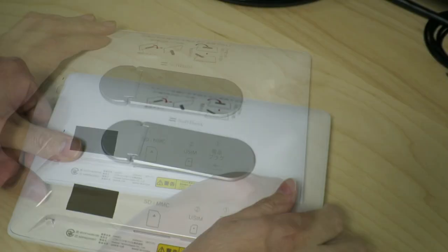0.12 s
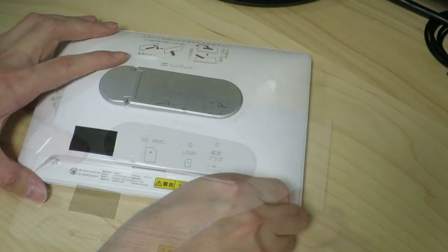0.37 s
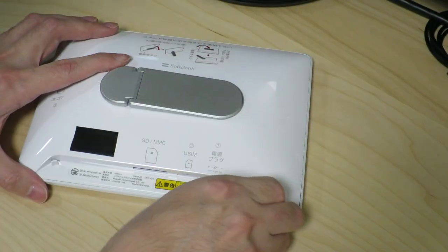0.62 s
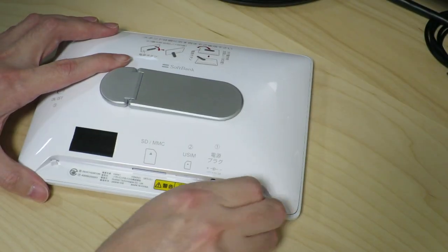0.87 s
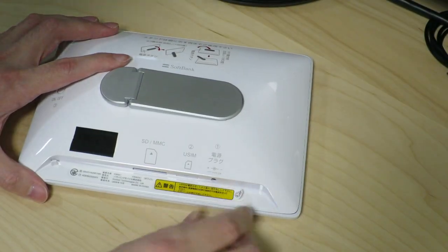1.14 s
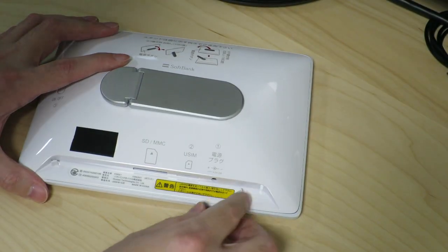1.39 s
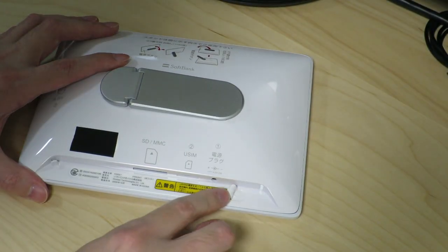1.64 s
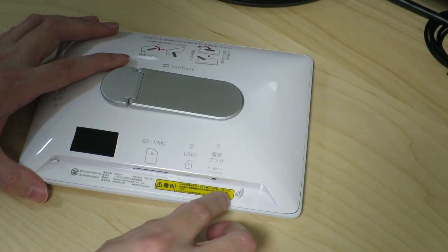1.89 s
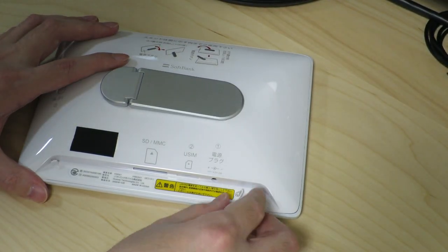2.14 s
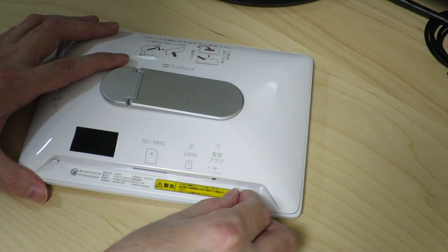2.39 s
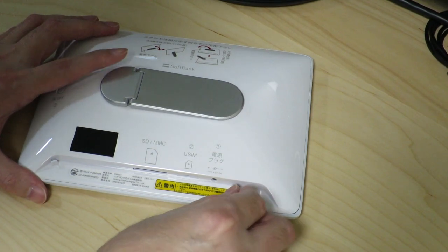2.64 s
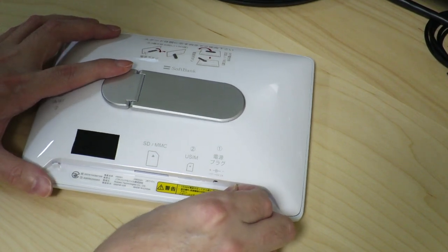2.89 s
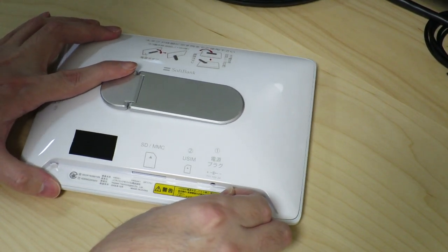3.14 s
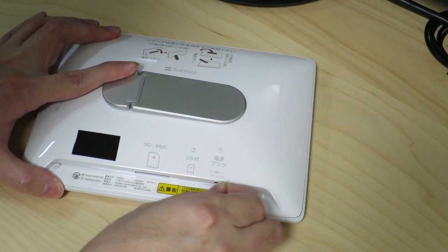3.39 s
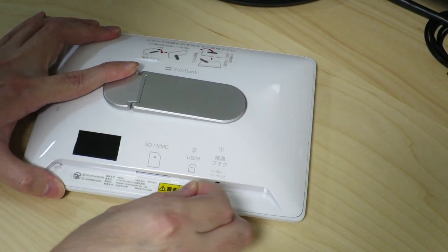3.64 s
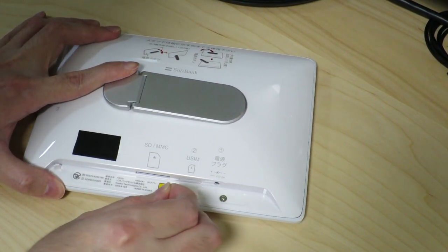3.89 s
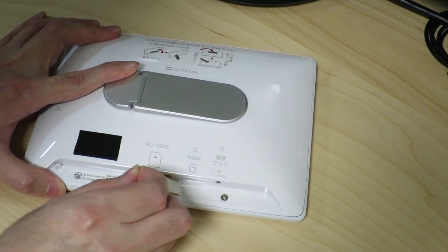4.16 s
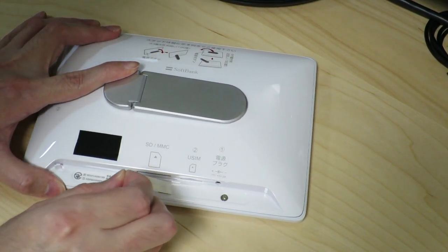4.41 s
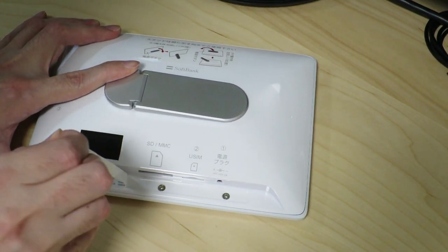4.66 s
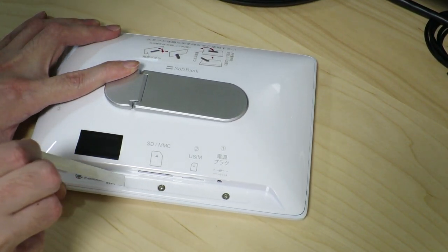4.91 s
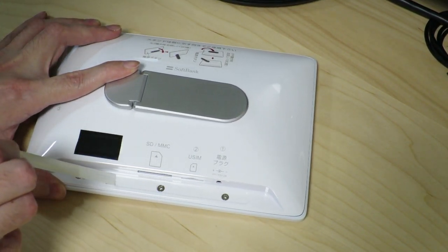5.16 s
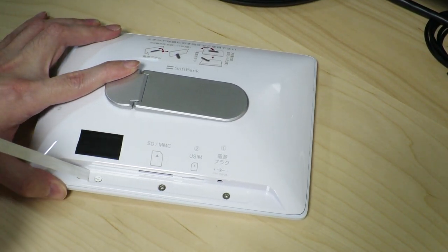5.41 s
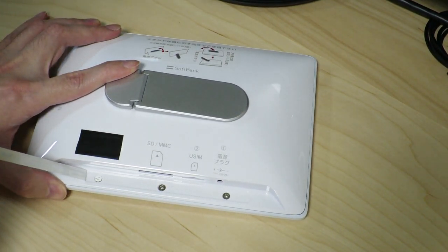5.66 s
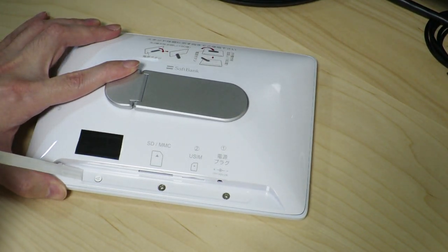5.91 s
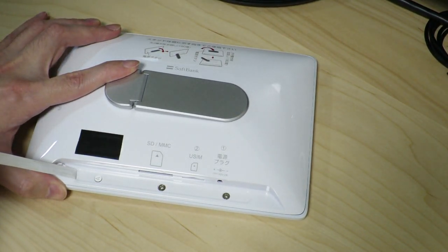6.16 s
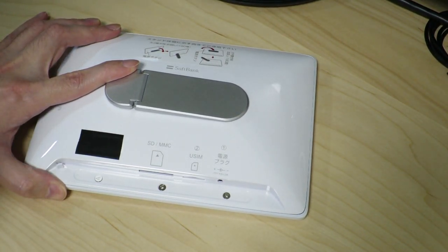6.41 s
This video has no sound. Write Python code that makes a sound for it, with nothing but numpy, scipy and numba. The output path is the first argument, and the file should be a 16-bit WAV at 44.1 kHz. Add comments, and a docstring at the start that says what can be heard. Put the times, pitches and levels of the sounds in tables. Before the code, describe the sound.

A small quiet room holds a soft, low fan hum with airy hiss and a barely noticeable, very high beating whine; a little extra rumble colours the first half second. At about 0.43 s a flat plastic gadget knocks solidly on a wooden desk. Tiny nail ticks follow, with clearer dry clicks on the hollow plastic back near 1.1, 1.43, 1.7 and 1.95 s, and a weaker one at 2.4. It stays nearly still until faint rubbing from 3.1 s and a short rip into a loud plastic pop at 3.5. Thin fizzing peel follows, with crackling bursts at 4.25 and 4.45, then a rapid dense tearing run from 4.6 to 4.75. Peeling softens, swells again around 5.4-5.5 with bright snaps, fades to light rubbing, and ends in crisp glue snaps at 6.4-6.45. Close and dry, with short reflections.

```python
"""A fan hums in a small room under two faint high whines that beat; then nails pick at a sticker strip
on the plastic back of a flat gadget on a wooden desk, and peel it off.
Noise bursts ring film and shell for nail slips and glue snaps; random snaps make the strokes and peel crackle.
Half-sine pushes ring desk and shell modes; filtered noise makes air, fan and rumble; sines make the whines.
A limiter turns everything down after loud peaks."""
import sys
import numpy as np
from scipy import signal
from scipy.fft import rfft, irfft
from scipy.io import wavfile
from scipy.ndimage import uniform_filter1d
from numba import njit

SR = 44100
rng = np.random.default_rng(int(sys.argv[2]) if len(sys.argv) > 2 else 0)


def invert_db(x):
    """Field ratio 10**(x/20) for x, a level in decibels (scalar or array-like)."""
    u = np.asarray(x, float) / 20
    return 10 ** u


def wrap_up_sound(samples):
    """Save the sound to the file named by the first command line argument, as 16-bit audio."""
    columns = np.atleast_2d(samples).T
    # keep every value between -1 and 1, then stretch to whole-number steps
    tamed = np.clip(columns, -1, 1)
    steps = np.round(tamed * 32767).astype(np.int16)
    wavfile.write(sys.argv[1], SR, steps)


N = 288458
T = np.arange(N) / SR

# Source levels below are ahead of room and limiter.
# air noise spectrum, relative: hz, density_db (per Hz)
AIR_SPECTRUM = [(30, -12.5), (60, -3.5), (146, -3), (400, -7.5), (750, -10), (1750, -12.5), (3570, -15.5),
                (7000, -20.5), (10800, -25.5), (14500, -29), (16000, -57)]
# fan resonances, before wander, pan and room gain: hz, width_hz, rms_db
FAN_RESONANCES = [(881.6, 77, -50.5), (1161, 95, -54), (1320, 57, -59), (1460, 46, -58.5)]
# side gain of air and fan: hz, gain_db
AIR_SIDE_GAIN = [(60, -8), (110, -0.5), (200, 5.5), (380, 7), (700, 1.5), (1290, -0.5), (2380, -4.5),
                 (4400, -6.5), (8120, -2.5), (15000, 0)]
# whines, before channel offsets and room gain: hz, rms_db, phase_rad
WHINES = [(15734.25, -53, 0.), (15747.29, -59, -1.65)]
# room and low rumble, louder over the first half second: time_s, room_gain_db, rumble_db (before wander)
ROOM_LEVELS = [(0, 3, -44.5), (.2, 2, -54), (.42, 2.5, -46), (.6, -1.5, -76), (.8, -0.5, -62.5),
               (6.54, -1.5, -65.5)]
# wall tail bands, relative: centre_hz, t60_s, gain_db
ROOM_BANDS = [(158, 0.2, -5), (960, 0.11, 1), (3800, 0.15, 1.5), (11700, 0.23, -12.5)]
# side gain of the near sounds' reflections: hz, gain_db
NEAR_SIDE_GAIN = [(60, -31), (400, -24), (1200, -10), (2600, -48), (4400, -9.5), (8000, -2), (15000, 2.5)]
# gadget bumps the desk top: start_s, peak_db, contact_ms
DESK_BUMPS = [(.043, -48, 0.8), (.4305, -5.5, 0.55)]
# desk modes, relative: hz, level_db, t60_s
DESK_MODES = [(129, 5.5, 0.083), (154, -3.5, 0.11), (255, -29, 0.078), (354.5, -15.5, 0.19),
              (513, -8, 0.097), (570, 3.5, 0.054), (665, -8, 0.13), (780, 4, 0.056), (865, 6, 0.05),
              (980, 0, 0.067), (1100, -5, 0.052), (1213, 5, 0.031), (1400, -30, 0.077), (1600, -5, 0.1),
              (2000, -26, .07), (2420, -20, .06), (2880, -23, .07)]
# shell flexes and knocks: start_s, peak_db, contact_ms
SHELL_KNOCKS = [(.692, -27, 1.3), (.701, -31, 0.85), (.712, -36, 4.2), (1.0945, -28, 0.65),
                (1.27, -31, 0.46), (1.432, -24.5, 1.47), (1.443, -26, 3.5), (1.466, -26, 0.78),
                (1.72, -35, 1.2), (1.935, -32, 1.15), (1.98, -34, 1.4), (2.413, -30, 1.2),
                (3.12, -34, 0.99), (3.15, -32, 0.71), (3.5283, -14.5, 0.92), (3.5303, 0, 1.1),
                (4.285, -28, 0.52), (4.592, -21.5, 1), (4.645, -32, 1.7), (4.684, -33.5, 1.6),
                (5.458, -30, 1.1), (6.402, -33, 1.4)]
# low shell modes, relative: hz, level_db, t60_s
SHELL_MODES = [(64, -10, 0.16), (110, 1, 0.069), (156, -6.5, 0.13), (268, -11.5, 0.15), (309, 2.5, 0.092),
               (351, 2.5, 0.052), (485, 6, 0.027), (539, 3, 0.043), (591, -4, 0.066), (746, -3.5, 0.046),
               (862, 9.5, 0.033), (954, 4, 0.044), (1054, 4.5, 0.055), (1260, -8, 0.2), (1440, -5, 0.13),
               (1574, -48, 0.087), (1904, -29, 0.064), (2180, -24, .07)]
# shell resonances, relative: hz, width_hz, level_db
SHELL_PEAKS = [(1514, 180, -3), (2244, 484, 5.5), (2492, 1150, 3.5), (3394, 1020, 2.5), (4250, 1180, 0.5),
               (5600, 2180, -4.5)]
# film resonances, relative: hz, width_hz, level_db
FILM_PEAKS = [(7150, 2500, 2.5), (9700, 1530, 2.5), (12450, 1550, 4), (14850, 840, 2)]
# slow peeling and rubbing: time_s, film_level_db
PEEL_LEVELS = [(0, -60), (.4, -66), (.53, -54), (1.02, -63), (1.16, -58.5), (1.4, -64), (1.6, -59),
               (1.9, -67), (2.2, -70), (3.04, -68), (3.11, -55), (3.23, -66), (3.28, -51), (3.42, -56),
               (3.49, -48), (3.55, -80), (3.69, -80), (3.71, -51), (3.76, -44.5), (3.87, -56),
               (4.07, -56.5), (4.23, -48), (4.36, -63), (4.44, -55), (4.46, -50.5), (4.6, -46.5),
               (4.8, -50), (4.89, -74), (4.99, -68), (5.03, -55), (5.11, -57), (5.27, -48), (5.42, -44),
               (5.54, -53), (5.6, -63), (6.0, -61), (6.14, -51), (6.24, -69.5), (6.32, -56), (6.54, -58)]
# crackle strokes: rips, fading crackle after nail slips, and a slower swell:
# start_s, rise_ms, hold_ms, fall_ms, film_level_db, shell_re_film_db
CRACKLE_STROKES = [(.742, 1, 2, 44, -50, -10), (1.1, 1, 2, 81, -40, -12), (1.44, 37, 2, 60, -55, 6),
                   (1.723, 0.9, 2, 54, -40, -2.5), (1.94, 1, 2, 85, -54, -12), (3.07, 37, 40, 90, -56.5, 3),
                   (3.498, 1, 28.4, 4.6, -24.5, -6), (4.237, 10, 3, 102, -28, -6.5),
                   (4.445, 1, 2, 50, -39, -5), (4.595, 1, 2, 26, -30, 1), (4.612, 21, 26, 25, -35.5, -2),
                   (4.67, 22.7, 43.5, 69, -22.5, -7.5), (5.452, 7.1, 4, 124, -28, -9.5),
                   (5.519, 1.2, 2, 32, -38, -12), (6.403, 1, 2, 59, -33, -7.5),
                   (6.43, 14.3, 4, 6.8, -36, -7.5), (6.453, 1, 1, 60, -30.5, -29)]
# nail slips and glue snaps, before pan:
# start_s, shell_peak_db, film_rms_db (first 4 ms), shell_hz (favoured), film_hz (favoured), tear_t60_ms
NAIL_TICKS = [(0.4301, -18, -50, 3180, 9000, 23), (0.5104, -57, -42, 1400, 12600, 8),
              (0.5197, -54, -40, 5280, 12600, 6), (0.5266, -55, -36, 1450, 12600, 11),
              (0.6014, -53, -50, 1460, 12600, 10), (0.738, -50, -44, 1680, 11500, 16),
              (0.8694, -56, -48, 1630, 11000, 10), (1.0893, -28, -27, 2600, 11600, 18),
              (1.0954, -22, -42, 2300, 12000, 19), (1.431, -17.5, -36, 3260, 10500, 16),
              (1.464, -22, -53, 3300, 11000, 13), (1.7154, -24.5, -33, 3270, 11000, 15),
              (1.745, -44, -42, 1440, 11000, 10), (1.9327, -26, -37.5, 2280, 12600, 15),
              (1.979, -31, -57, 1470, 11000, 12), (2.4133, -32, -48, 2060, 10900, 11),
              (2.736, -48, -52, 3210, 11000, 11), (3.448, -49, -44, 2480, 11000, 13),
              (3.5, -17, -31, 5270, 11000, 11), (3.5296, -10, -30.5, 1400, 9150, 14),
              (3.7199, -33, -49, 5400, 12000, 12), (3.7783, -38, -45, 1460, 12000, 11),
              (4.245, -23, -25, 3280, 11000, 18), (4.2482, -18.5, -25, 3320, 11000, 16),
              (4.2515, -23, -31, 3230, 12000, 18), (4.2602, -28, -22, 2160, 9800, 7.1),
              (4.2668, -24, -34, 3550, 10000, 9), (4.284, -22.5, -32, 2290, 9000, 19),
              (4.4391, -25, -27.5, 4400, 11000, 6.7), (4.592, -17, -25, 4640, 10200, 16),
              (4.621, -34, -30, 1960, 12600, 12), (4.639, -32, -33, 5600, 12600, 11),
              (4.666, -28, -34, 5700, 12000, 15), (4.682, -15, -26, 5740, 10000, 21),
              (4.6912, -13.5, -22, 5770, 10000, 8), (4.7029, -16, -21, 5290, 10000, 9.1),
              (4.713, -17.5, -22, 4260, 10000, 17), (4.746, -16, -23, 5100, 10900, 12),
              (5.0164, -55, -51, 1520, 10000, 8), (5.12, -55, -51, 2830, 10000, 8),
              (5.1335, -40, -43, 1400, 12000, 11), (5.412, -35, -43, 4400, 9000, 13),
              (5.461, -21.5, -18, 4420, 11800, 24), (5.471, -28, -23, 3850, 11500, 8.9),
              (5.5164, -24, -25, 5480, 9700, 8), (6.3143, -53, -47, 1630, 13000, 10),
              (6.3314, -52, -44, 1460, 14500, 13), (6.4011, -14, -24.5, 4240, 10900, 4.2),
              (6.409, -44, -35, 4110, 13000, 8), (6.44, -20, -46, 4290, 8000, 15),
              (6.4505, -23.5, -13, 3800, 9800, 5.9), (6.457, -46, -32, 5900, 9600, 14)]

AIR_RMS_DB = -46.5  # before pan and room gain
TONE_PAN_DB = 2.5  # air and fan mid, left minus right
WET_DB = -7
PEEL_SHELL_DB, PEEL_RATTLE_DB = -6, 1.5  # shell re film, low rattle re shell
STROKE_RATTLE_DB = -3.5  # re shell
RISE_DB, FALL_DB = 15, 30  # stroke swell over rise_ms, decay per fall_ms
TICK_PAN_DB, TICK_PAN_SCATTER_DB = -1.5, 3  # left minus right
LIMIT_DB, LIMIT_POWER = -7.0, 0.72
TOP_HZ = 16050


def shape(x, table):
    """Colour by a (hz, db) table on a log axis."""
    size = x.shape[-1]
    hz, db = np.transpose(table)
    f = np.maximum(np.arange(size // 2 + 1) * SR / size, 1)
    return irfft(rfft(x) * invert_db(np.interp(np.log(f), np.log(hz), db)), size)


def level(x, db):
    """Scale to an rms level."""
    return x * invert_db(db) / np.sqrt(np.mean(x ** 2))


def steep(x, hz):
    """High-pass: small parts do not radiate bass."""
    return signal.sosfilt(signal.butter(3, hz, "high", fs=SR, output="sos"), x)


def ring(x, peaks):
    """Sum of resonances of alternating sign."""
    out = 0
    for k, (hz, width_hz, db) in enumerate(peaks):
        b, a = signal.iirpeak(hz, hz / width_hz, fs=SR)
        out = out + (-1) ** k * invert_db(db) * signal.lfilter(b, a, x)
    return out


def add(out, x, start_s):
    """Mix x into out from start_s."""
    i = int(start_s * SR)
    out[..., i:i + x.shape[-1]] += x[..., :N - i]


def walk(rate_hz):
    """Random values held 1 / rate_hz seconds and smoothed twice; spread near 1."""
    k = int(SR / rate_hz)
    steps = np.repeat(rng.standard_normal(N // k + 1), k)
    return 1.1 * uniform_filter1d(uniform_filter1d(steps, k), k)[:N]


def fading_noise(seconds, t60_s):
    """Noise that dies away, unit energy."""
    t = np.arange(int(seconds * SR)) / SR
    x = rng.standard_normal(len(t)) * invert_db(-60 * t / t60_s)
    return x / np.sqrt(np.sum(x ** 2))


def struck(modes, offsets_db):
    """Impulse response of a set of modes: decaying sines."""
    t = np.arange(int(.3 * SR)) / SR
    return sum(invert_db(db + offset_db - 60 * t / t60_s) * np.sin(2 * np.pi * hz * t)
               for (hz, db, t60_s), offset_db in zip(modes, offsets_db))


def air_and_fan():
    """Coloured air noise plus noise through fan resonances whose level wanders about 1 dB."""
    air = level(shape(rng.standard_normal(N), AIR_SPECTRUM), AIR_RMS_DB)
    fan = 0
    for hz, width_hz, db in FAN_RESONANCES:
        narrow = ring(rng.standard_normal(N), [(hz, width_hz, 0)])
        fan = fan + level(ring(narrow, [(hz, 2 * width_hz, 0)]), db)
    return air + fan * invert_db(walk(11))


def whines():
    """Two close steady sines beat; the left is weaker and a quarter cycle ahead."""
    return np.array([sum(np.sqrt(2) * invert_db(db + offset_db) * np.sin(2 * np.pi * hz * T + rad + lead_rad)
                         for hz, db, rad in WHINES)
                     for offset_db, lead_rad in ((-8.0, np.pi / 2), (3.5, 0))])


def low_rumble(rumble_db):
    """Noise through two low resonances, with a wandering level."""
    rumble = ring(rng.standard_normal(N), [(153, 59, -6.0), (343, 140, -2.5)])
    return level(rumble, 0) * invert_db(rumble_db + 2 * walk(24))


def room_tone():
    """Air, fan and whines share one level curve; the low rumble has its own."""
    time_s, room_db, rumble_db = np.transpose(ROOM_LEVELS)
    mid = air_and_fan() * invert_db(np.array([[TONE_PAN_DB], [-TONE_PAN_DB]]) / 2)
    side = shape(air_and_fan(), AIR_SIDE_GAIN)
    tone = mid + np.array([side, -side]) + whines()
    return tone * invert_db(np.interp(T, time_s, room_db)) + low_rumble(np.interp(T, time_s, rumble_db))


def wall_tail():
    """Walls return band-filtered fading noise, each band with its own t60, after 130 samples."""
    tail = 0
    for hz, t60_s, db in ROOM_BANDS:
        band = signal.butter(2, [hz / 2.68, min(hz * 3.04, 20000)], "band", fs=SR, output="sos")
        tail = tail + invert_db(db) * signal.sosfilt(band, fading_noise(.3, t60_s))
    return np.pad(tail, (130, 0))


def in_room(near):
    """Desk reflections part the channels, most in the treble; the walls add a short tail."""
    mono = near.mean(0)
    mid_tail = invert_db(WET_DB) * signal.fftconvolve(mono, wall_tail())[:N]
    side_tail = invert_db(WET_DB) * signal.fftconvolve(mono, wall_tail())[:N]
    early = rfft(np.pad(fading_noise(.04, 0.02), (12, 0)), N)
    # early scatter smears phase only, not colour
    scatter = irfft(rfft(mono) * early / abs(early), N)
    side = shape(scatter + side_tail, NEAR_SIDE_GAIN)
    return near + mid_tail + np.array([side, -side])


def blows(events, modes, scatter_db):
    """A half-sine push of the contact time rings the modes; longer contact is duller."""
    out = np.zeros(N)
    for start_s, peak_db, contact_ms in events:
        push = np.sin(np.pi * np.clip(T[:400] / (contact_ms / 1000), 0, 1))
        response = struck(modes, scatter_db * rng.standard_normal(len(modes)))
        blow = steep(signal.fftconvolve(response, push), 127)
        add(out, invert_db(peak_db) * blow / abs(blow).max(), start_s)
    return out


def crackle(film_gain, shell_gain, rattle_db, rate_per_s, spread_db, grain_db):
    """Glue threads snap at random moments, sizes uneven, ringing film, shell and low shell modes."""
    snaps = (rng.random(N) < rate_per_s / SR) * rng.standard_normal(N)
    size_db = spread_db * np.minimum(rng.exponential(size=N), 4) + grain_db * walk(250)
    snaps = level(snaps * invert_db(size_db), 0)
    film = film_gain * level(steep(ring(snaps, FILM_PEAKS), 8900), 0)
    shell = shell_gain * level(ring(snaps, SHELL_PEAKS), 0)
    low = steep(struck(SHELL_MODES, np.zeros(len(SHELL_MODES))), 223)
    low = low / np.sqrt(np.sum(low ** 2))
    rattle = signal.fftconvolve(snaps * shell_gain * invert_db(rattle_db), low)[:N]
    return film + shell + rattle


def peeling():
    """Slow peel: a thin fizz of snaps that follows the level table."""
    gain = invert_db(np.interp(T, *np.transpose(PEEL_LEVELS)))
    return crackle(gain, gain * invert_db(PEEL_SHELL_DB), PEEL_RATTLE_DB, 9000, 0.58, 2.8)


def crackle_strokes():
    """Denser, more uneven crackle: each stroke rises, holds and dies away."""
    film_gain, shell_gain = np.zeros(N), np.zeros(N)
    for start_s, rise_ms, hold_ms, fall_ms, film_db, shell_db in CRACKLE_STROKES:
        # decay runs for twice fall_ms
        corners_s = np.cumsum(np.maximum([0, rise_ms, hold_ms, 2 * fall_ms], 1e-3)) / 1000
        t = T[:int(corners_s[-1] * SR)]
        gain = invert_db(film_db + np.interp(t, corners_s, [-RISE_DB, 0, 0, -2 * FALL_DB]))
        add(film_gain, gain, start_s)
        add(shell_gain, gain * invert_db(shell_db), start_s)
    return crackle(film_gain, shell_gain, STROKE_RATTLE_DB, 12000, 2.7, 1.6)


def favour(peaks, spot_hz, db_per_octave):
    """Weaken resonances far from the touched spot's own."""
    return [(hz, width_hz, db - db_per_octave * abs(np.log2(hz / spot_hz))) for hz, width_hz, db in peaks]


def ticks():
    """A moment of tearing rings the film and shell resonances nearest the touched spot's own."""
    out = np.zeros((2, N))
    for start_s, shell_db, film_db, shell_hz, film_hz, tear_ms in NAIL_TICKS:
        pan_db = TICK_PAN_DB + TICK_PAN_SCATTER_DB * rng.standard_normal()
        tear = fading_noise(.05, tear_ms / 1000)
        shell = ring(tear, favour(SHELL_PEAKS, shell_hz, 6.7))
        film = steep(ring(tear, favour(FILM_PEAKS, film_hz, 15)), 6500)
        shell = invert_db(shell_db) * shell / abs(shell).max()
        film = invert_db(film_db) * film / np.std(film[:SR // 250])  # first 4 ms
        add(out, invert_db(np.array([[pan_db], [-pan_db]]) / 2) * (shell + film), start_s)
    return out


def scene():
    """Everything the hands do shares one room."""
    bumps = blows(DESK_BUMPS, DESK_MODES, 0.97)
    knocks = blows(SHELL_KNOCKS, SHELL_MODES, 3.3)
    near = ticks() + crackle_strokes() + peeling() + bumps - knocks  # knocks in opposite polarity
    return room_tone() + in_room(near)


@njit
def follow(x, attack, hold, release):
    """Peak follower that holds before it lets go."""
    e, wait, out = 1e-6, 0., np.empty(len(x))
    for i in range(len(x)):
        if x[i] > e:
            e, wait = e + attack * (x[i] - e), hold
        elif wait > 0:
            wait -= 1
        else:
            e *= release
        out[i] = e
    return out


def limiter(x):
    """Both channels turn down after a peak, hold, then recover."""
    # attack 1.3 ms, hold 0.13 s, follower release 60 dB in 0.5 s
    peak = follow(abs(x).max(0), 1 / (0.0013 * SR), .13 * SR, invert_db(-60 / (.5 * SR)))
    return x * np.minimum(invert_db(LIMIT_DB) / peak, 1) ** LIMIT_POWER


def roll_off(x):
    """The treble ends steeply here."""
    return signal.sosfilt(signal.butter(12, 17140, fs=SR, output="sos"), x)


def record(dry):
    """Limit, then cut the top with a steep low-pass."""
    low_pass = signal.ellip(8, .3, 50, TOP_HZ, fs=SR, output="sos")
    mix = signal.sosfilt(low_pass, limiter(dry))
    return roll_off(mix)


dry = scene()
out = record(dry)
wrap_up_sound(out)
```